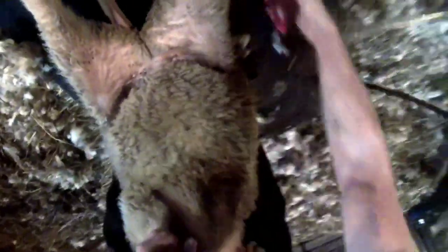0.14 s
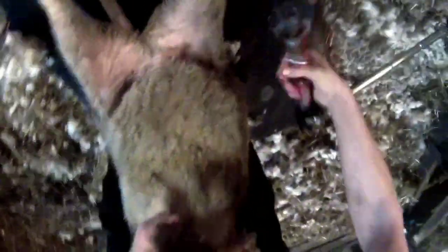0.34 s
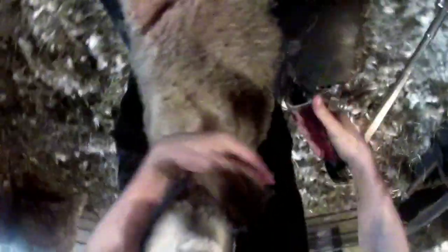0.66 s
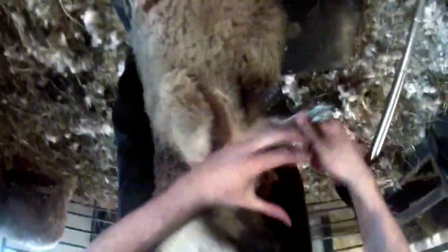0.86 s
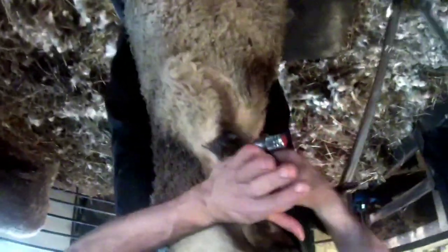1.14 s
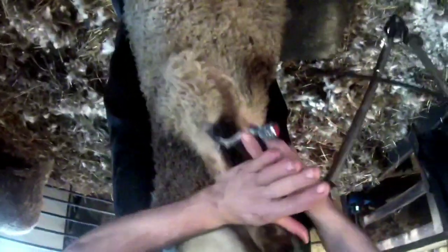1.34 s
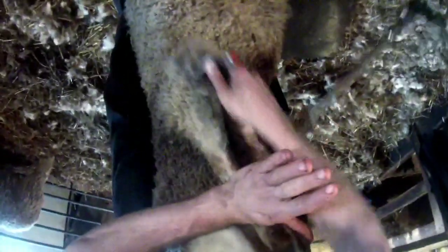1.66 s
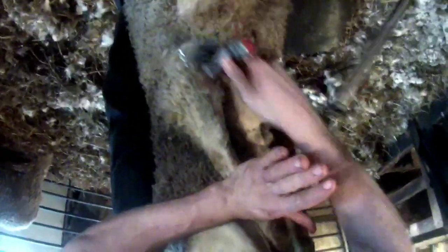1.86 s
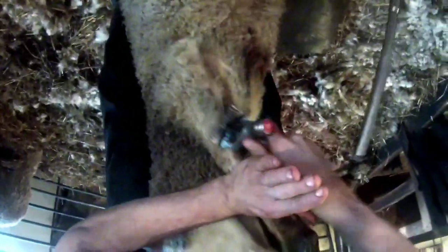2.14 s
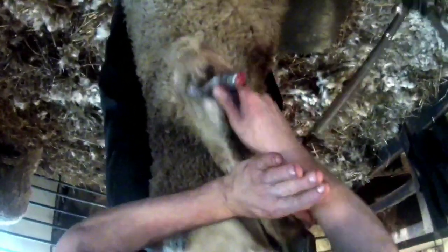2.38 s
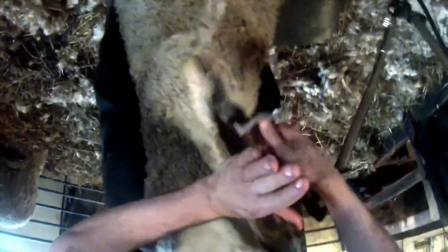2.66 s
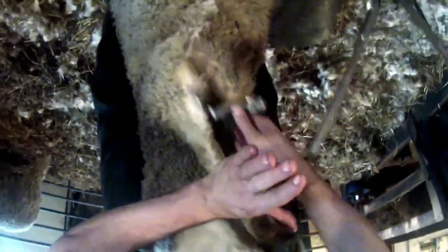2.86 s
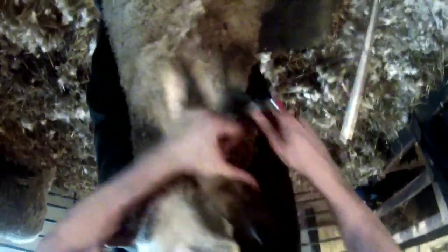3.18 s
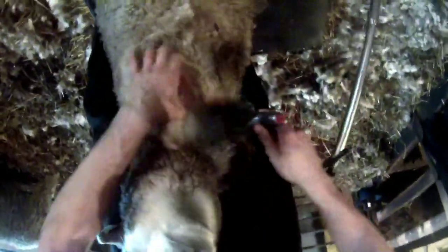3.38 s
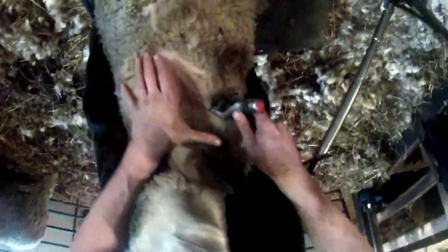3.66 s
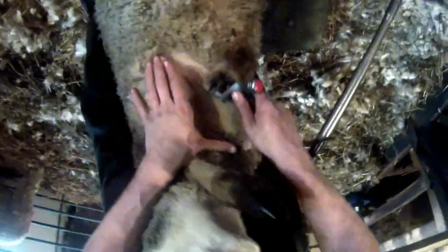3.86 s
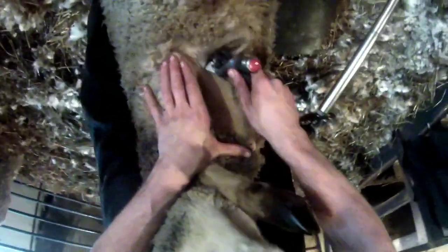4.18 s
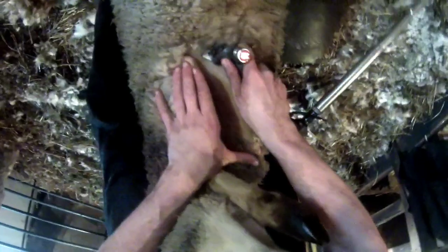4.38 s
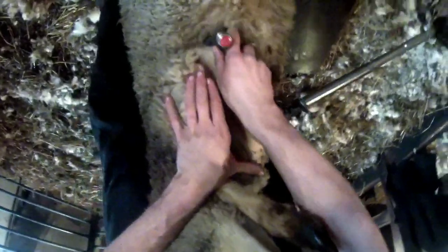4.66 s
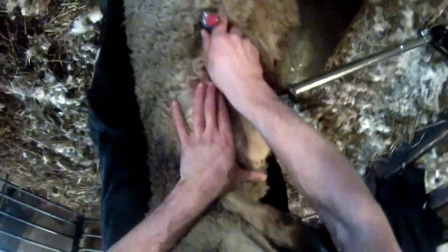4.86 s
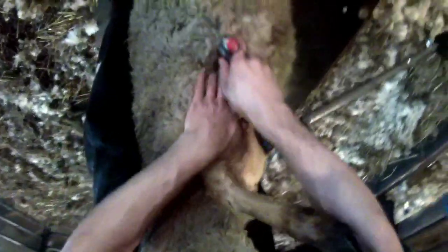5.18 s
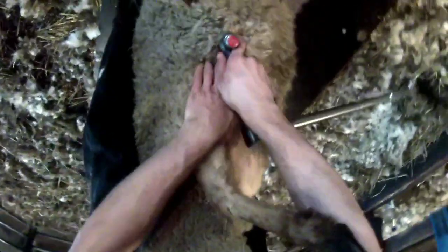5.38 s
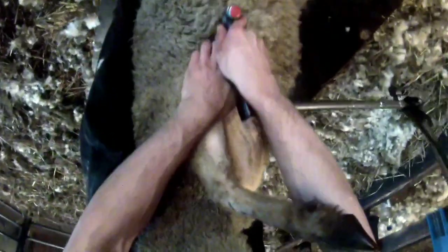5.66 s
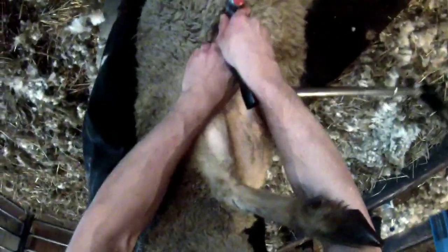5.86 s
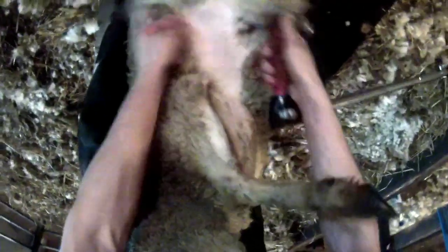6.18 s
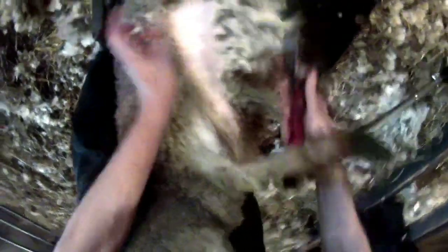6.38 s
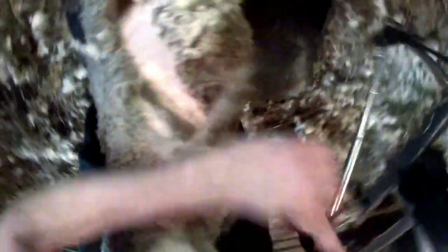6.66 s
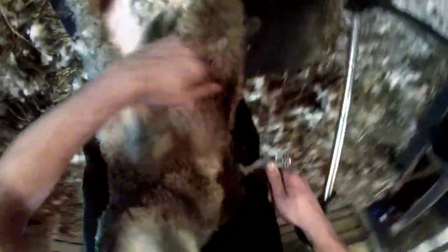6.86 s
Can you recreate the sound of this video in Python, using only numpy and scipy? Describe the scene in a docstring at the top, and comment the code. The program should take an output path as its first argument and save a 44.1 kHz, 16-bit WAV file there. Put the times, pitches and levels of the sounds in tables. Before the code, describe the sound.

An electric shearing handpiece runs the whole time, cutting through a sheep's fleece in a barn. It makes a fast, even metallic buzz and rattle, with a hissing rasp that swells as it is pushed into the wool. The blades ring briefly now and then, and a faint gear whine rises past the middle. The close, head-worn microphone catches a low buffet of air at the start and soft rumbles of movement afterwards.

```python
"""In a barn, a shaft-driven shearing handpiece runs through a sheep's fleece, close to a head-worn
microphone. Its crank turns about 58 times a second: loose joints knock and ring the housing and the
fork, the cutter rasps over the comb and now and then sings, wool fibres snap and the drive gears whine.
Underneath, the shearer's movement rumbles in the microphone over the still air of the barn."""
import sys
import numpy as np
from scipy import signal
from scipy.fft import rfft
from scipy.io import wavfile
from scipy.ndimage import uniform_filter1d

SR = 44100
rng = np.random.default_rng(int(sys.argv[2]) if len(sys.argv) > 2 else 0)


def materialize(psi):
    """Save the field psi as 16-bit PCM at rate SR to the path in sys.argv[1].

    A 1-D psi becomes a single channel; in a 2-D psi each row is a channel.
    """
    bounded = np.clip(np.atleast_2d(psi).T, -1, 1)
    quanta = np.round(bounded * 32767).astype(np.int16)
    wavfile.write(sys.argv[1], SR, quanta)


N = 310023
TIME = np.arange(N) / SR

# Pushes into the fleece. Each row: peak time in seconds, length in seconds, extra rasp in dB.
PUSHES = [(0.302, 0.69, 2), (0.69, 0.66, 1.5), (1.51, 0.11, 2.5), (1.764, 0.59, 3), (2.178, 0.37, 2),
          (2.845, 0.66, 3), (3.38, .25, 1.5), (3.786, 0.69, 3.5), (4.32, 0.89, 1.5), (4.73, .16, 1.5),
          (5.01, 0.34, 1.5), (5.5, 0.57, 1), (5.864, 0.45, 2), (6.364, 0.25, 2), (6.663, 0.46, 3),
          (7.0, 0.58, 3)]
def handpiece(turns):
    """Knocks and scraping, with their echoes, set the metal ringing; each push adds rasp."""
    knock = knocks(turns)
    scrape = unit_rms(barn_echo(friction(turns, knock), wet_db=-9.5))
    knock = unit_rms(barn_echo(knock, wet_db=4.5))
    push_db = sum(db * swell(s, length) for s, length, db in PUSHES)
    body = fork(turns, knock, scrape) + housing(turns, knock, scrape)
    return body + blades(knock, scrape, push_db) + cutting(turns, knock, scrape, push_db) + singing(turns)


# Loose joints, loudest where the cutter reverses. Each row: place in the turn (0-1), strength in dB.
JOINTS = [(.04, -4), (.13, -7), (.25, -4), (.34, 0), (.39, -4), (.5, -7), (.61, -3), (.72, -5), (.79, -3),
          (.84, 1), (.95, -4)]
def knocks(turns, drift_turns=.008, sway_db=1.1, uneven_db=.7, scatter_us=50):
    """Each joint takes up its slack once a turn, never at quite the same instant or strength."""
    out, reach = np.zeros(N), np.arange(-8, 9)
    scatter_samples = scatter_us * SR / 1e6 * gain_of(.5 * wander(1.72))
    for place, db in JOINTS:
        due = np.arange(1, int(turns[-1]) - 1) + place
        at = np.interp(due, turns + drift_turns * wander(1.5), np.arange(N))
        late, strong = rng.standard_normal((512, 2))[:len(at)].T
        knock_db = db + sway_db * wander(2.3)[at.astype(int)] + uneven_db * np.clip(strong, -2, 2)
        size = gain_of(knock_db) * rng.choice([-1, 1])
        # uneven timing blurs the high overtones into hiss and leaves the low ones clear
        at = at + late * scatter_samples[at.astype(int)]
        near = at.astype(int)[:, None] + reach
        clicks = np.sinc(near - at[:, None]) * np.hanning(len(reach))  # can fall between samples
        np.add.at(out, np.clip(near, 0, N - 1), size[:, None] * clicks)
    return unit_rms(out)


def friction(turns, knock, scuff_s=.0007, grit_db=1.0, uneven_db=.6):
    """The cutter scrapes out and back over the comb; each knock scuffs it, and the contact is gritty."""
    scuff = unit_rms(signal.lfilter([1], [1, -np.exp(-1 / (scuff_s * SR))], knock ** 2))
    swing = turns + .05 * wander(1.2)
    pressure = .68 + .55 * stroke(swing, .83, .1) + .25 * stroke(swing, .34, .1)
    grains = np.repeat(rng.standard_normal(N // 16 + 1), 16)[:N]
    grit = gain_of(grit_db * grains + uneven_db * wander(55))
    return unit_rms(np.sqrt(pressure ** 2 + scuff) * grit * rng.standard_normal(N))


# How the fork rings. Each row: pitch in Hz, width in Hz, relative level in dB.
FORK_RINGS = [(1998, 46, -2), (2210, 140, -1.5), (2297, 450, 1.5), (2452, 215, 1.5), (2710, 360, -5)]
# Its clean buzz. Each row: multiple of the crank speed, level in dB compared with the ringing.
FORK_BUZZ = [(35, -20.5), (36, -17), (37, -14.5), (38, -20), (39, -16.5), (40, -16), (41, -15.5), (42, -16),
             (46, -20.5)]
# How loud the fork is. Each row: time in seconds, level in dB.
FORK_LEVEL = [(.07, -52), (.3, -49), (.93, -49), (1.18, -52.5), (1.47, -49.3), (1.7, -48), (2.45, -51.5),
              (2.7, -49), (3.3, -48.7), (3.8, -50.5), (4.27, -53), (4.8, -51.5), (5.04, -48.5), (5.26, -55),
              (5.42, -51), (5.57, -52.5), (5.79, -48.5), (5.97, -51), (6.55, -52), (6.74, -49.7),
              (7.03, -52)]
def fork(turns, knock, scrape):
    """The fork rings mostly from the knocks and buzzes at overtones of the crank."""
    buzz = sum(tone(round(k) * turns, db, sway_db=2.0, slip_cycles=.15) for k, db in FORK_BUZZ)
    ringing = metal(knock, scrape, FORK_RINGS, knock_share=.82)
    return gain_of(curve(FORK_LEVEL)) * steadied(ringing + buzz)


# How the housing rings. Each row: pitch in Hz, width in Hz, relative level in dB.
HOUSING_RINGS = [(1412, 60, -7.5), (1529, 163, 1), (1634, 102, -2), (1743, 110, -7.5)]
# How loud it is as the hand turns the tool. Each row: time in seconds, level in dB.
HOUSING_LEVEL = [(0.0, -52), (0.06, -59), (0.33, -52), (0.41, -57.5), (0.62, -51.5), (0.8, -56),
                 (1.86, -49.5), (2.09, -54.5), (2.15, -51), (2.21, -56), (2.62, -54.5), (2.72, -59),
                 (2.76, -51), (3.01, -57), (3.84, -54), (3.95, -56), (4.03, -51.5), (4.31, -55),
                 (4.48, -50), (4.58, -52), (5.52, -50), (5.6, -53.5), (5.72, -50), (5.95, -53), (6.23, -54),
                 (6.38, -58.5), (6.62, -52.5), (6.85, -57.5), (6.99, -54.5), (7.03, -58)]
def housing(turns, knock, scrape):
    """The housing rings lower than the fork, and drones as well."""
    ringing = metal(knock, scrape, HOUSING_RINGS, knock_share=.65)
    return gain_of(curve(HOUSING_LEVEL)) * steadied(ringing + housing_drone(turns))


# The housing's buzz. Each row: multiple of the crank speed, level in dB compared with the ringing.
HOUSING_BUZZ = [(24, -14.5), (25, -13.5), (26, -8), (27, -18.5), (28, -10.5), (29, -12)]
# Drones under load. Each row: peak time in seconds, length in seconds, then multiple and dB as above.
DRONES = [(.31, .25, 26, -1), (.62, .3, 26, -2), (1.5, .35, 26, -1), (1.87, .4, 26, 1.5),
          (1.85, .55, 28, -3), (2.16, .2, 26, 0), (2.75, .4, 24, -3), (2.82, .25, 26, -2),
          (3.98, .55, 25, -2), (4.5, .22, 28, 0), (4.6, .4, 24, -4), (4.78, .25, 26, -1),
          (4.85, .6, 29, -4), (5.3, .75, 26, 3), (5.35, .4, 25, -3), (5.75, .25, 28, -1),
          (6.17, .3, 26, -1), (6.6, .25, 26, -1)]
def housing_drone(turns):
    """The housing buzzes at clean overtones of the crank; load makes one or another swell."""
    out = np.zeros(N)
    for multiple, db in HOUSING_BUZZ:
        load_power = sum((gain_of(drone_db) * swell(s, length)) ** 2
                         for s, length, which, drone_db in DRONES if which == round(multiple))
        overtone = tone(round(multiple) * turns, 0, sway_db=1.3, slip_cycles=.11)
        out += np.sqrt(gain_of(db) ** 2 + load_power) * overtone
    return out


# How the comb, teeth and cutter ring. Each row: pitch in Hz, width in Hz, relative level in dB.
COMB_RINGS = [(2915, 220, -12), (3130, 183, 0.5)]
TEETH_RINGS = [(3707, 510, 0)]
CUTTER_RINGS = [(4420, 590, -4), (4886, 750, -0.5), (5450, 320, 0), (5880, 510, -4.5)]
# How loud the comb is, quieter when deep in the fleece. Each row: time in seconds, level in dB.
COMB_LEVEL = [(0, -61.5), (.4, -55.5), (1.1, -59.5), (2.25, -56), (2.5, -62), (2.75, -59), (2.95, -51.5),
              (3.2, -59), (3.5, -57), (3.9, -56), (4.25, -60), (4.7, -63), (5.05, -60), (5.25, -63),
              (5.7, -59), (6.1, -59.5), (6.4, -56), (7.03, -57)]
def blades(knock, scrape, push_db):
    """The blades rasp as they rub; the teeth and cutter grow louder with each push."""
    comb = metal(knock, scrape, COMB_RINGS, knock_share=.55, db=curve(COMB_LEVEL))
    teeth = metal(knock, scrape, TEETH_RINGS, knock_share=.48, db=-57 + .9 * push_db)
    cutter = metal(knock, scrape, CUTTER_RINGS, knock_share=.38, db=-55.5 + 1.29 * push_db)
    return comb + teeth + cutter


# How the cutting edges ring. Each row: pitch in Hz, width in Hz, relative level in dB.
EDGE_RINGS = [(6780, 700, 2), (7590, 1400, 0.5), (9500, 2800, -11), (11260, 1400, -15),
              (14200, 3000, -24.5)]
def cutting(turns, knock, scrape, push_db, flutter_db=.5):
    """The edges and the snapping wool hiss, fluttering as the fleece feeds in unevenly."""
    fork_db = curve(FORK_LEVEL)
    facing_db = .17 * (fork_db - fork_db.mean())  # the edges turn to the microphone with the fork
    edges = metal(knock, scrape, EDGE_RINGS, knock_share=.21, db=-58 + .87 * push_db + facing_db)
    wool = gain_of(-71 + .8 * push_db) * unit_rms(ring(fibres(turns), [(10200, 21000, 0)]))
    return (edges + wool) * gain_of(flutter_db * wander(60))


def fibres(turns, per_s=1500, spread_db=1.0, clump_db=3.5):
    """Wool fibres snap in clumps as the teeth close, twice a turn."""
    closing = .2 + stroke(2 * turns, .66, .22)
    snaps = (rng.random(N) < closing * per_s / SR) * rng.choice([-1, 1], N)
    snap_db = spread_db * np.minimum(rng.exponential(1, N), 3) + clump_db * wander(60)
    return unit_rms(snaps * gain_of(snap_db))


# Moments when the blades sing. Each row: peak time in seconds, length in seconds, pitch in Hz,
# width in Hz, slide in Hz per second, level in dB, place in the turn (0-1).
SINGS = [(0.213, .16, 2324, 327, 0, -45.5, 0.23), (.462, 0.16, 2340, 280, 0, -51.5, 0.15),
         (0.302, .49, 6830, 704, 2, -54, .63), (0.689, .32, 3200, 604, 700, -52, 0.67),
         (0.698, .3, 4300, 1100, 1200, -54, 0.55), (1.343, .34, 3660, 320, 500, -55, 0.8),
         (2.045, 0.3, 3520, 500, 0, -59, 0.9), (2.969, .47, 7980, 720, -600, -60, 1),
         (2.994, .4, 4900, 350, 0, -57.5, 1), (3.398, 0.37, 2860, 180, 0, -55, 0.56),
         (3.758, .36, 2480, 200, -300, -50, 0.38), (3.97, .23, 2680, 230, 502, -54, 0.47),
         (4.04, .16, 7700, 450, 0, -58, 0.25), (4.304, .38, 3245, 240, -1500, -56, 0.56),
         (4.325, .66, 5720, 500, 300, -54.5, 1), (4.703, .31, 5570, 500, -400, -55, 0.7),
         (4.937, 0.098, 3030, 650, 0, -54.5, 0.6), (5.132, .4, 3634, 130, 0, -58.5, .42),
         (5.469, .46, 5600, 380, 0, -56, 1), (5.883, .17, 7850, 700, 0, -58, .5),
         (6.48, 0.43, 6840, 400, -4, -59.5, 0.8), (6.682, .5, 2645, 200, 2, -53.5, 1)]
def singing(turns, between_strokes=.51):
    """Binding blades sing one note, strongest once a stroke; it slides as the grip changes."""
    out = np.zeros(N)
    for s, length, hz, width, glide, db, place in SINGS:
        span = abs(TIME - s) < length / 2
        grip = between_strokes + stroke(turns[span], place, .14)
        rub = grip * rng.standard_normal(2 * SR)[:span.sum()]
        note = ring(rub, [(hz, width, 0)])[:len(rub)]
        slide = np.exp(1j * np.pi * glide * (TIME[span] - s) ** 2)
        voice = steadied((signal.hilbert(note) * slide).real, samples=2300)
        out[span] += gain_of(db) * np.sqrt(abs(swell(s, length)[span])) * voice
    return out


# Gear whines under sideways load. Each row: peak time in seconds, length in seconds,
# level in dB of the meshing teeth's tone, level in dB of a side tone above it.
WHINES = [(.25, 0.31, -79, -73), (1.3, 0.32, -70, -86), (1.85, 1, -70.5, -92), (3.28, 0.45, -71.5, -86),
          (3.554, 0.34, -65.5, -83), (3.727, 0.41, -79, -65.5), (4.0, 0.4, -68, -68),
          (4.232, 0.38, -66.5, -64.5), (4.495, 0.48, -61.5, -71), (5.0, 0.86, -68, -78),
          (5.36, 0.57, -66, -79), (6.02, 0.4, -63.5, -82), (6.198, 0.3, -64, -73)]
def gears(turns, idle_mesh_db=-77, idle_side_db=-80):
    """Twelve gear teeth mesh each turn and whine, with two side tones just above."""
    mesh_load = sum((gain_of(db) * swell(s, length)) ** 2 for s, length, db, _ in WHINES)
    side_load = sum((gain_of(db) * swell(s, length)) ** 2 for s, length, _, db in WHINES)
    mesh_db = 10 * np.log10(gain_of(idle_mesh_db) ** 2 + mesh_load)
    side_db = 10 * np.log10(gain_of(idle_side_db) ** 2 + side_load)
    mesh = tone(12 * turns, mesh_db, sway_db=1.2, slip_cycles=.06)
    side = tone(14 * turns, side_db, sway_db=1.0, slip_cycles=.08)
    between = tone(13 * turns, (mesh_db + side_db) / 2 - 7, sway_db=4.5, slip_cycles=.24)
    return mesh + side + between


# The drive shaft's faint overtones. Each row: multiple of the crank speed, level in dB.
SHAFT_TONES = [(5, -86), (11, -84), (15, -93), (16, -84.5), (17, -81), (18, -80.5), (19, -83), (20, -82),
               (21, -84), (22, -83)]
def shaft(turns):
    """The spinning shaft hums at the crank speed and its overtones."""
    hum = tone(turns, -66, sway_db=2.5, slip_cycles=.083)
    return hum + sum(tone(round(k) * turns, db, sway_db=3.5, slip_cycles=.16) for k, db in SHAFT_TONES)


# The motor's tones. Each row: pitch in Hz, level in dB.
MOTOR_TONES = [(100, -78.5), (1023, -73.5)]
def motor():
    """The distant motor hums at its own steady pitch."""
    return sum(tone(hz * TIME, db, sway_db=1.0, slip_cycles=.083) for hz, db in MOTOR_TONES)


# The shearer shifts himself and the sheep. Each row: peak time in seconds, length in seconds,
# extra rumble in dB, change of rustle in dB.
MOVES = [(.7, 0.56, 3.5, -.5), (1.19, 0.29, 9, -0.5), (1.47, 0.4, 4.5, 1), (2.032, .2, 8.5, 2),
         (2.696, 0.62, 8, -1.5), (3.296, 0.8, 3.5, -0.5), (4.6, .25, 2.5, 3), (5.227, 0.22, 7, 1),
         (5.67, 0.23, 7, 2.5), (6.71, 0.78, 5, 1.5)]
# The tone colour of the rumble and the rustle. Each row: frequency in Hz, relative level in dB.
RUMBLE_COLOUR = [(3, 6.5), (9, 9), (14, 5.5), (22, -2.5), (35, -8), (55, -20), (80, -24), (150, -36.5),
                 (400, -68), (2000, -90)]
RUSTLE_COLOUR = [(20, -4), (90, -3), (150, 1), (300, -4.5), (500, -14), (1000, -15.5), (4000, -25.5)]
def movement(still_rumble_db=-51.5, still_rustle_db=-70.5):
    """The shearer's movement rumbles in the microphone and rustles softly."""
    rumble_db = still_rumble_db + sum(db * np.sqrt(abs(swell(s, length))) for s, length, db, _ in MOVES)
    rustle_db = still_rustle_db + sum(db * swell(s, length) for s, length, _, db in MOVES)
    rumble = gain_of(rumble_db) * steadied(noise(RUMBLE_COLOUR))
    return rumble + gain_of(rustle_db) * noise(RUSTLE_COLOUR)


# How loud the gust is. Each row: time in seconds, level in dB.
GUST_LEVEL = [(0, -53), (.09, -30.5), (.23, -36.5), (.34, -29), (.44, -44), (.6, -57), (.8, -90)]
# Its tone colour. Each row: frequency in Hz, relative level in dB.
GUST_COLOUR = [(3, -16), (9, 4), (14, -1), (22, -12), (35, -15), (55, -31.5), (150, -46.5), (2000, -100)]
def gust():
    """Air buffets the microphone as the shearer first swings round."""
    return gain_of(curve(GUST_LEVEL)) * steadied(noise(GUST_COLOUR))


# How long the barn echoes. Each row: frequency in Hz, seconds to fade by 60 dB.
ECHO_FADE = [(200, 0.44), (2000, 0.32), (6000, 0.71), (15000, 0.64)]
def barn_echo(x, wet_db, patterns=4, patterns_per_s=2.22):
    """Adds a short echo; the moving hand passes from one echo pattern to the next."""
    reflections = rng.standard_normal((patterns, SR // 3)) * (np.arange(SR // 3) > SR // 200)
    hz, t, spectra = signal.stft(reflections, SR, nperseg=256)
    fade = gain_of(-60 * t / value_at(ECHO_FADE, hz)[:, None])
    tails = signal.istft(spectra * fade, SR, nperseg=256)[1]
    spot, out = patterns_per_s * TIME, x.copy()
    for k, tail in enumerate(tails):
        away = (spot - k + patterns / 2) % patterns - patterns / 2
        near = np.sqrt(np.maximum(1 - abs(away), 0))
        out += gain_of(wet_db) * signal.oaconvolve(x * near, tail / np.linalg.norm(tail))[:N]
    return out


# The tone colour of the barn's air. Each row: frequency in Hz, relative level in dB.
AIR_COLOUR = [(20, -8), (80, 3.5), (150, -8), (300, -4.5), (500, -4.5), (800, -1), (1200, -7.5), (3000, -6),
              (16000, -16)]
def barn_air():
    """The still air of the barn is a faint, even hush."""
    return gain_of(-63) * noise(AIR_COLOUR)


def metal(knock, scrape, rings, knock_share, db=0):
    """One piece of metal, rung by its own blend of knocking and scraping."""
    blend = np.sqrt(knock_share) * knock + np.sqrt(1 - knock_share) * scrape
    return gain_of(db) * steadied(ring(blend, rings))


def ring(x, rings):
    """Passes x through steep-sided resonances that ring after each blow."""
    hz = np.fft.rfftfreq(4096, 1 / SR)
    power = sum(gain_of(db) ** 2 / (1 + (2 * (hz - f) / width) ** 2) ** 2 for f, width, db in rings)
    log_gain = np.log(np.r_[power, power[-2:0:-1]] + 1e-10) / 2
    # minimum phase: the ringing never comes before the blow
    response = np.fft.ifft(np.exp(np.conj(signal.hilbert(log_gain)))).real[:2048]
    return signal.oaconvolve(x, response)[:N]


def tone(cycles, db, sway_db, slip_cycles):
    """A tone that wavers in level and slips a little ahead and behind."""
    peak = np.sqrt(2) * gain_of(db + sway_db * wander(3))
    return peak * np.sin(2 * np.pi * (cycles + slip_cycles * wander(12)))


def noise(colour):
    """Noise of average (rms) level 1 with the given tone colour."""
    gains = gain_of(value_at(colour, np.fft.rfftfreq(N, 1 / SR)))
    return unit_rms(np.fft.irfft(rfft(rng.standard_normal(N)) * gains, N))


def wander(per_s):
    """A smooth random drift with up to per_s wobbles a second."""
    t = TIME[::128]
    rates = per_s * np.geomspace(1 / 10, 1, 14)
    waves = np.sin(2 * np.pi * (rates[:, None] * t + rng.random((len(rates), 1))))
    return np.interp(TIME, t, unit_rms(waves.sum(0)))


def stroke(turns, place, width):
    """A bump once a turn, centred on the given place."""
    return np.exp(-(((turns - place + .5) % 1 - .5) / width) ** 2)


def swell(s, length):
    """An arch from 0 up to 1 and back, centred on second s."""
    return np.where(abs(TIME - s) < length / 2, np.cos(np.pi * (TIME - s) / length), 0)


def curve(rows):
    """Joins (time, value) rows into a line with rounded corners."""
    return uniform_filter1d(np.interp(TIME, *np.transpose(rows)), size=3000)


def value_at(rows, hz):
    """Looks up (frequency, value) rows, with octaves evenly spaced."""
    f, value = np.transpose(rows)
    return np.interp(np.log(hz + 1), np.log(f + 1), value)


def gain_of(db):
    """Turns decibels into a factor."""
    return 10 ** (np.asarray(db) / 20)


def unit_rms(x):
    """Scales x to an average (rms) level of 1."""
    return x / np.sqrt(np.mean(x ** 2) + 1e-20)


def steadied(x, samples=8820):
    """Holds the level near 1 over every stretch of this many samples."""
    return x / np.sqrt(abs(uniform_filter1d(x ** 2, size=samples)) + 1e-20)


# How fast the crank spins. Each row: time in seconds, turns per second.
CRANK_SPEED = [(0.0, 57.7), (0.06, 57.3), (0.25, 58.3), (0.33, 57.4), (0.37, 57.9), (1.11, 57.5),
               (1.55, 58.2), (2.0, 57.5), (2.23, 58.0), (2.58, 57.9), (2.76, 58.4), (3.21, 57.6),
               (3.58, 58.0), (4.52, 57.5), (4.68, 57.9), (4.74, 57.4), (4.82, 58.0), (5.11, 57.6),
               (5.82, 58.1), (5.89, 57.6), (6.03, 58.2), (6.23, 58.3), (6.87, 57.7), (7.03, 58.0)]
def scene():
    """One crank times the handpiece, gears and shaft; the other sounds lie underneath."""
    turns = np.cumsum(curve(CRANK_SPEED)) / SR
    machine = handpiece(turns) + gears(turns) + shaft(turns) + motor()
    return (machine + movement() + gust() + barn_air())[None]


def record(dry, dip_db=-5.5, treble_limit_hz=15700):
    """The level dips briefly near the end, and the highest treble is cut throughout."""
    dipped = dry * gain_of(dip_db * swell(s=6.827, length=.017))
    lowpass = signal.firwin(801, treble_limit_hz, window=("kaiser", 9), fs=SR)
    return signal.oaconvolve(dipped, lowpass[None], "same")


dry = scene()
out = record(dry)
materialize(out)
```